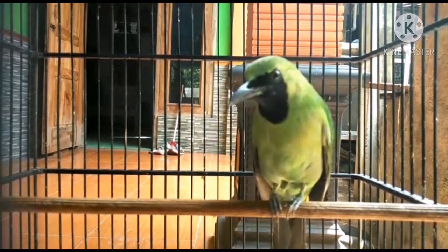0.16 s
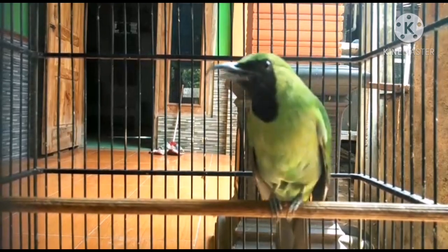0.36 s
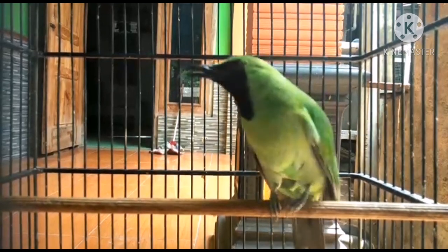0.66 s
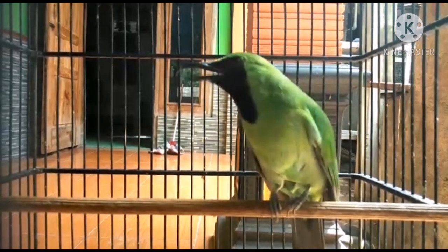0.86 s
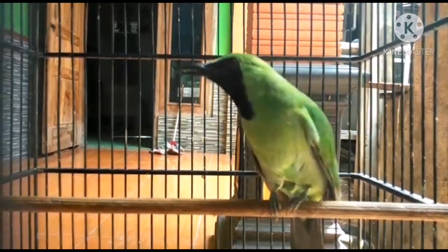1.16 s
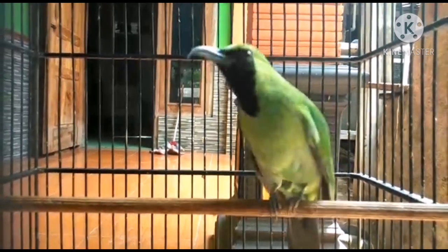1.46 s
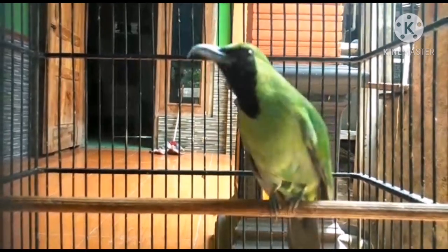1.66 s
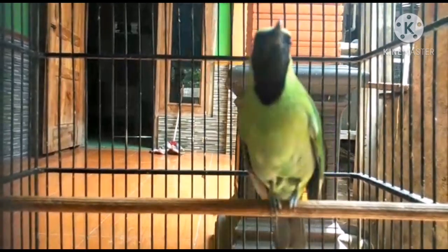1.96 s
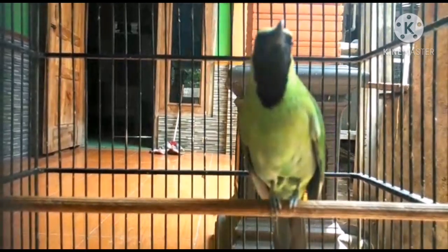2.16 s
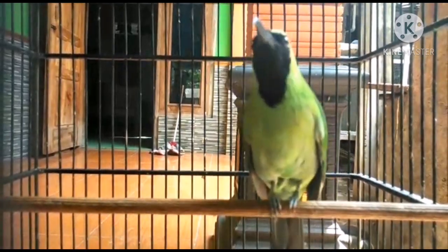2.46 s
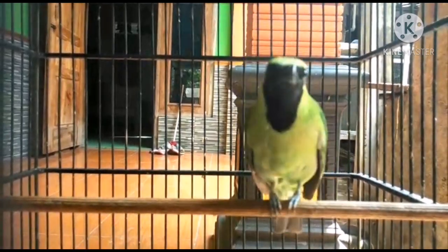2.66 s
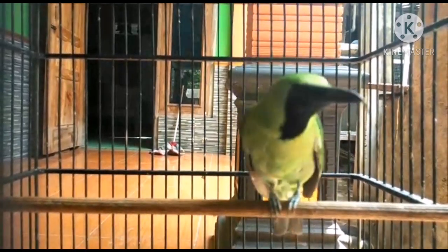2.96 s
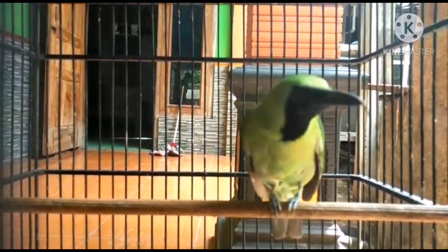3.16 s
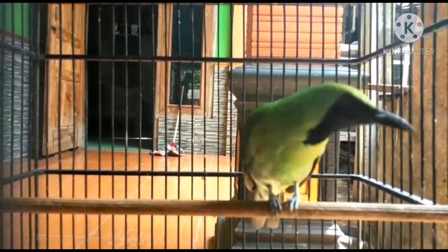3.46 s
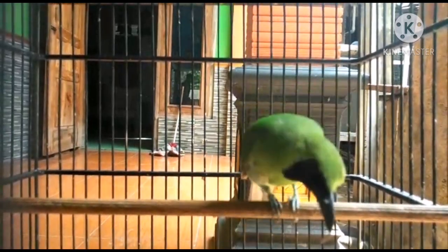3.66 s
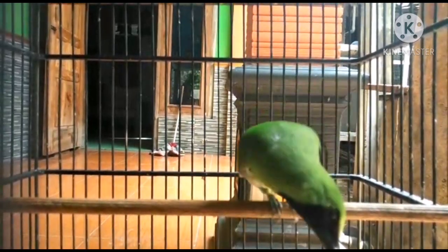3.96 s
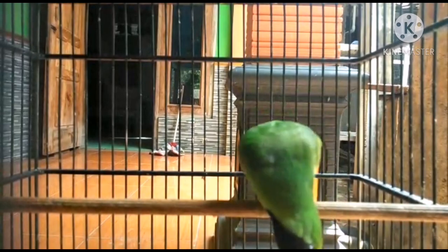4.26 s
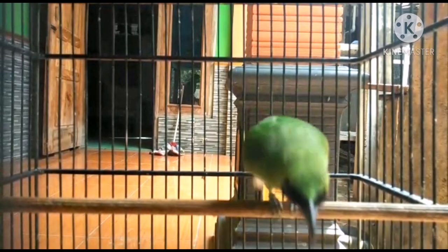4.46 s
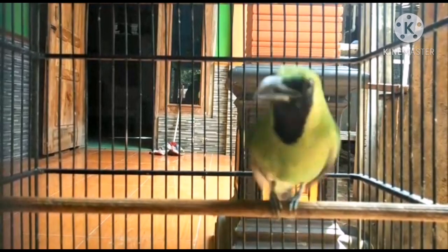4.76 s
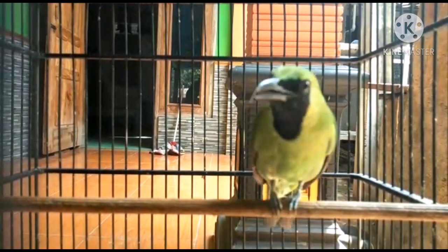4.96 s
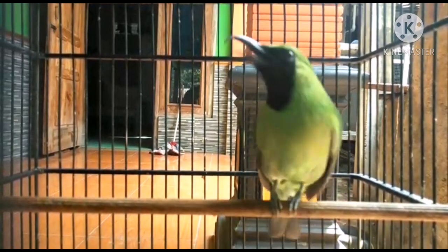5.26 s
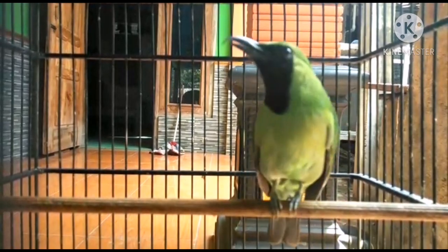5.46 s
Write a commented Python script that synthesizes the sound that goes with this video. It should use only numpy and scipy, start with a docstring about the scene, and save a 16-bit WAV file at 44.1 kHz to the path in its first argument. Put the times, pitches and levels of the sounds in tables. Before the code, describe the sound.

Loud, clear birdsong on a hard-walled terrace shifts from downward whistles to warbles, upward chirps and harsh buzzy notes, with a fainter bird beyond.

```python
"""A caged leafbird sings close by on a terrace: falling whistles, chatter, low warbles and hooks, rising
whistles, then rasping sweeps. Each note is a gliding tone with weak overtones plus turbulent hiss; the two
sides of the syrinx sometimes sound together. Enveloped noise makes clicks and the thud of a shuffle on the perch.
Floor and walls return the song as echoes and a decaying tail. A second bird sings thin tones farther off,
over a faint outdoor hush of shaped noise and steady hum."""
import sys
import numpy as np
from scipy import signal
from scipy.fft import rfft, irfft
from scipy.io import wavfile
from scipy.ndimage import uniform_filter1d, minimum_filter1d

SR = 44100
rng = np.random.default_rng(int(sys.argv[2]) if len(sys.argv) > 2 else 0)


def int16_out(signal):
    """Quantize to a 16-bit WAV file."""
    q = np.round(np.clip(np.atleast_2d(signal).T, -1, 1) * 32767)
    wavfile.write(sys.argv[1], SR, q.astype(np.int16))


N = 247401  # samples

OVERLAP_S = 0.004  # successive parts of a note overlap a little
STEADY = 0.003  # rms pitch tremble of a clear note, as a share of the pitch


def amp(db):
    """Level law: decibels to amplitude gain."""
    return 10 ** (np.asarray(db) / 20)


def unit(x):
    """Power normalisation: scales a signal to rms 1."""
    return x / np.sqrt(np.mean(x ** 2) + 1e-20)


def read(points, hz):
    """Interpolation on a logarithmic frequency axis."""
    f, value = np.transpose(points)
    return np.interp(np.log(hz + 1), np.log(f + 1), value)


def add(mix, s, sound):
    """Superposition: adds a sound into the mix at time s, in seconds."""
    part = mix[max(round(s * SR), 0):][:len(sound)]
    part += sound[:len(part)]


def noise(colour):
    """Spectral shaping: white noise weighted in frequency, then scaled to rms 1."""
    spectrum = rfft(rng.standard_normal(N))
    weight = amp(read(colour, np.fft.rfftfreq(N, 1 / SR)))
    return unit(irfft(spectrum * weight, N))


def waver(size, rate_hz):
    """Low-passed random modulation: a cycle of 8192 samples at rms 1, cut or repeated to size."""
    hz = np.fft.rfftfreq(8192, 1 / SR)
    spectrum = rfft(rng.standard_normal(8192))
    return np.resize(unit(irfft(spectrum / (1 + (hz / rate_hz) ** 4))), size)


def gesture(note, jitter, jitter_hz, fade=0.0036):
    """Frequency jitter and tapering: trembles the pitch and softens both ends over fade seconds."""
    s, pitch, level = note
    t = np.arange(len(pitch)) / SR
    ends = np.sin(np.pi / 2 * np.clip(np.minimum(t, t[-1] - t) / fade, 0, 1)) ** 2
    return s, pitch * np.exp(jitter * waver(len(t), jitter_hz)), level * ends


def swell(length, db, attack, release, curve):
    """Amplitude envelope: progress 0-1 and loudness; attack and release are shares of the length."""
    u = np.linspace(0, 1, round(length * SR))
    ramps = np.minimum(u / attack, 1) * np.minimum((1 - u) / release, 1)
    return u, amp(db) * ramps ** curve  # a higher curve is more pointed


def glide(s, length, pitches, db, attack, release, curve=1, ease=0):
    """Frequency glide: a polynomial through evenly spaced pitches; ease levels off its end."""
    u, level = swell(length, db, attack, release, curve)
    arc = np.polyfit(np.linspace(0, 1, len(pitches)), pitches, len(pitches) - 1)
    return s, np.polyval(arc, u - ease * u ** 10 / 10), level


def terrace(x, echo_db, tail_db, build=0.059):
    """Room response by convolution: direct sound, single echoes and a diffuse frequency-dependent decay."""
    # echoes from floor and walls: delay/s, level before echo_db/dB
    echoes = [(.0062, -29.5), (0.0097, -16.5), (0.016, -36), (0.0232, -20), (.031, -28.5), (0.041, -24.5)]
    # reverberation time: f/Hz, time to decay by 60 dB/s
    decay_times = [(500, 0.11), (2000, .52), (3000, 0.47), (5000, 0.64), (8000, 0.26), (15000, 0.55)]
    t = np.arange(SR) / SR
    hz, frame_s, z = signal.stft(rng.standard_normal(SR), SR, nperseg=256)
    decay = amp(-60 * frame_s / read(decay_times, hz)[:, None])
    tail = signal.istft(z * decay, SR, nperseg=256)[1][:SR]
    tail *= np.minimum(t / build, 1)  # the tail builds up first
    response = amp(tail_db) * tail / np.linalg.norm(tail)
    response[0] += 1
    for delay, db in echoes:
        response[round(delay * SR)] += amp(db + echo_db)
    return signal.fftconvolve(x, response)[:N]


def hush():
    """Stationary background: shaped noise of still outdoor air with the steady sines of a faint hum."""
    # spectrum of the air: f/Hz, relative level per Hz/dB
    air_colour = [(21, -39), (35, -6), (184, -6), (276, -19.5), (330, -6.5), (437, -12.5), (496, -6),
                  (938, -11), (1180, -13.5), (2020, -13.5), (2180, -22.5), (2350, -16.5), (3440, -23.5),
                  (15500, -33.5)]
    # faint steady tones of the neighbourhood: f/Hz, rms level/dB
    hum = [(774, -76), (921, -71.5)]
    t = np.arange(N) / SR
    sound = amp(-59) * noise(air_colour)
    for hz, db in hum:
        sound += amp(db) * np.sqrt(2) * np.sin(2 * np.pi * hz * t)
    return sound


def perch():
    """Impact excitation: decaying bursts of bright noise for clicks, slower low noise for the thud."""
    # claws on the perch and snaps of the beak: t/s, level/dB, decay to 1/e/s
    clicks = [(0.048, -51, 0.016), (0.307, -47, 0.0061), (.474, -44.5, 0.013), (.49, -37, 0.017),
              (.513, -40, 0.021), (0.864, -47.5, 0.0092), (1.36, -55, 0.0091), (2.23, -60.5, 0.0061),
              (2.589, -67.5, 0.0094), (5.465, -44, 0.042)]
    # click spectrum: f/Hz, relative level per Hz/dB
    click_colour = [(150, -14), (700, 5), (1800, 6), (4500, -4.5), (6800, 4.5), (9000, -9), (12000, -17),
                    (15000, 2)]
    # the perch takes the weight of the bird: t/s, level/dB
    thud = [(0.473, -71.5), (.5, -46), (0.517, -41.5), (.535, -53), (.57, -57.5), (0.679, -71)]
    # ring of the perch: f/Hz, relative level per Hz/dB
    thud_colour = [(40, -21.5), (85, -4.5), (125, -1), (250, -11), (450, -15.5), (720, -5), (1000, -14.5),
                   (2000, -34.5), (4000, -56.5)]
    t = np.arange(N) / SR
    strokes = np.zeros(N)
    for s, db, decay in clicks:
        add(strokes, s, amp(db) * np.exp(-t[:SR // 4] / decay))
    s, db = np.transpose(thud)
    weight = np.interp(t, s, amp(db), left=0, right=0)
    return strokes * noise(click_colour) + weight * noise(thud_colour)


def thin_tones(notes, jitter, jitter_hz):
    """Frequency modulation of bare sines: a fast, deep tremble turns a thin tone into a buzz."""
    song = np.zeros(N)
    for note in notes:
        start, hz, level = gesture(note, jitter, jitter_hz)
        add(song, start, level * np.sin(2 * np.pi * np.cumsum(hz) / SR))
    return song


def far_bird():
    """Light and deep frequency modulation: arched whistles and level buzzes of the second bird."""
    # whistles: t/s, length/s, first, middle and last f/Hz, level at the bird/dB
    whistle_rows = [ (.612, 0.03, 5600, 5900, 5700, -46), (.705, .075, 4000, 4380, 4100, -43),
                    (2.703, 0.079, 4830, 5120, 5060, -42.5), (2.823, 0.06, 5900, 5800, 5830, -43.5),
                    (2.823, .062, 5500, 5170, 5260, -45.5), (2.896, 0.067, 4490, 4770, 4640, -43.5),
                    (3.638, 0.054, 4650, 4790, 4730, -41), (3.835, 0.054, 4700, 5380, 5090, -36.5),
                    (4.108, 0.061, 4710, 5035, 5060, -39)]
    # buzzes: t/s, length/s, centre f/Hz, level at the bird/dB
    buzz_rows = [(0.599, .12, 6610, -39), (1.518, 0.061, 6900, -55), (1.6, 0.43, 6930, -66),
                 (2.636, 0.055, 6100, -40.5), (2.804, 0.074, 6600, -47.5), (3.1, .052, 6850, -60.5),
                 (3.547, 0.096, 6550, -43), (3.766, 0.071, 6450, -41), (4.037, 0.082, 6400, -40.5),
                 (5.349, 0.086, 6350, -44)]
    whistles = [glide(s, length, pitches, db, attack=0.13, release=0.59)
                for s, length, *pitches, db in whistle_rows]
    buzzes = [glide(s, length, [hz], db, attack=0.37, release=0.25)
              for s, length, hz, db in buzz_rows]
    return thin_tones(whistles, jitter=0.015, jitter_hz=350) + thin_tones(buzzes, jitter=0.092, jitter_hz=600)


def fading():
    """Free decay: a faint sine at one pitch, an earlier whistle dying away."""
    # t/s, length/s, f/Hz, level/dB
    s, length, hz, db = (0, 0.9, 2949.5, -49.5)
    note = glide(s, length, [hz], db, attack=0.05, release=0.7)
    return thin_tones([note], jitter=0.02, jitter_hz=200)


def leafbird(notes, overtone_db, slope_db, brighten, half_db, air_db, air_power, fuzz_db, fuzz_hz,
             jitter, jitter_hz, fade, linger, flicker_db=4):
    """Source and filter: a syrinx tone with weak overtones, half-pitch lines of uneven cycles, and turbulence."""
    # gain of throat and beak on the overtones: f/Hz, gain/dB
    beak = [(1000, -2.5), (1400, -4), (3000, 4.5), (4200, -16.5), (5200, -16.5), (5900, -8), (7300, 0.5),
            (8600, -14.5), (10500, -13.5), (12800, -10.5), (14700, 3), (16000, -1)]
    # air rushing with each note: f/Hz, relative level per Hz/dB
    air_colour = [(300, -10.5), (900, 0.5), (2500, -2), (4700, -3.5), (7000, 0.5), (9000, -9),
                  (11500, -17.5), (13500, -14.5), (15200, -5), (16000, -7)]
    song, flow = np.zeros(N), np.zeros(N)
    for note in notes:
        start, hz, level = gesture(note, jitter, jitter_hz, fade)
        phase = 2 * np.pi * np.cumsum(hz) / SR
        force_db = 20 * np.log10(level / amp(-16.5) + 1e-6)
        # pushing harder closes the syrinx more sharply, which lifts the high overtones
        octave_db = np.minimum(slope_db + brighten * force_db, 0)
        tone = np.sin(phase)
        for half in (1, *range(3, 17)):  # multiples of half the pitch, without the fundamental
            k = half / 2
            line_db = overtone_db + octave_db * max(np.log2(k / 2), 0)
            line_db += half_db * (half % 2) + read(beak, k * hz)
            line_db += flicker_db * waver(len(hz), 56)  # each overtone comes and goes by itself
            audible = k * hz < SR / 2
            tone += amp(line_db) * audible * np.sin(k * phase)
        # turbulence grows more slowly than the tone, so quiet starts and ends are the noisiest
        rush = amp(air_power * force_db)
        fuzz = waver(len(hz), fuzz_hz) * np.sin(phase) + waver(len(hz), fuzz_hz) * np.cos(phase)
        add(song, start, level * tone + amp(fuzz_db) * rush * fuzz)
        add(flow, start, rush)
    keep = np.exp(-1 / (linger * SR))  # the hiss swells and fades more slowly than the note
    hiss = signal.lfilter([1 - keep], [1, -keep], flow) * noise(air_colour)
    return song + amp(air_db) * hiss


def fall(s, length, first_hz, low_hz, turn_s, db, release):
    """Downward frequency sweep: the pitch swings to its lowest point and starts to come back."""
    u, level = swell(length, db, attack=0.33, release=release, curve=1.22)
    # a power under 1 brings the fall early
    swing = np.cos(np.pi / 2 * (u * length / turn_s) ** 0.88) ** 2
    return s, low_hz + (first_hz - low_hz) * swing, level


def chatters():
    """Beating of two voices: strokes overlap and a loud crest bursts out on top of the last."""
    # t/s, level of the strokes/dB, crest f/Hz, crest level/dB
    chatter_rows = [(.873, -19, 2767, -10.5), (1.115, -18, 2560, -16)]
    # strokes from alternate sides of the syrinx:
    # delay/s, length/s, first, middle and last f/Hz, level relative to the strokes/dB
    stroke_rows = [(.001, 0.027, 1940, 2400, 2790, -8), (.015, .048, 2310, 1884, 1600, -2.5),
                   (.037, .022, 2150, 2040, 1980, -3), (.058, .052, 1675, 2600, 1679, -1)]
    crest_delay_s, crest_s, crest_rise_hz = 0.073, 0.019, 129
    for s, db, crest_hz, crest_db in chatter_rows:
        for delay, length, *pitches, stroke_db in stroke_rows:
            yield glide(s + delay, length, pitches, db + stroke_db, attack=0.33, release=0.7, curve=0.63)
        crest = [crest_hz - crest_rise_hz, crest_hz]
        yield glide(s + crest_delay_s, crest_s, crest, crest_db, attack=0.36, release=0.45)


def warbles(gain_db=3):
    """Joint frequency and amplitude modulation: low notes sag, catch and drop away."""
    # one list for each warble: t/s, f/Hz, level before gain_db/dB
    warble_rows = [
        [(1.378, 2110, -34.5), (1.396, 2050, -20), (1.412, 1862, -19.5), (1.424, 1863, -20.5),
         (1.432, 2089, -22), (1.444, 1900, -17.5), (1.452, 2040, -30), (1.462, 1770, -20), (1.472, 1667, -26.5),
         (1.479, 1665, -35.5)],
        [(1.637, 2180, -43), (1.641, 2205, -33.5), (1.665, 2034, -21), (1.683, 1999, -16.5), (1.691, 1998, -23),
         (1.699, 2122, -23.5), (1.711, 2020, -18.5), (1.723, 2023, -24), (1.733, 1697, -24), (1.746, 1613, -37)],
    ]
    for rows in warble_rows:
        s, hz, db = np.transpose(rows)
        s = np.sort(s)
        t = np.arange(s[0], s[-1], 1 / SR)
        yield s[0], np.interp(t, s, hz), np.interp(t, s, amp(db + gain_db))


def hooks():
    """Register break: a wavy coo steps up steeply to an arch, whose end is roughened by the other side."""
    # t of the step/s, coo f/Hz, coo level/dB, step length/s, step level/dB,
    # arch length/s, its first, middle and last f/Hz, arch level/dB
    hook_rows = [(1.965, 1938, -20, 0.016, -12, .037, 2916, 2762, 2386, -11.5),
                 (2.296, 2011, -19, .021, -10, 0.035, 2700, 2958, 2684, -14),
                 (2.654, 2006, -20, .019, -11.5, .038, 2680, 2990, 2770, -11)]
    coo_s, coo_wave_hz = 0.052, (-170, 3.5, -69, 0)  # the coo waves about its pitch
    step_hz = (2174, 2810)
    join_share, join_hz, join_db = 0.4, (3173, 3200, 2930), -24.5  # the other side joins part-way
    for s, coo_hz, coo_db, step_s, step_db, arch_s, *pitches, db in hook_rows:
        top = s + step_s - OVERLAP_S
        coo = np.add(coo_hz, coo_wave_hz)
        yield glide(s - coo_s, coo_s + OVERLAP_S, coo, coo_db, attack=0.48, release=0.45, curve=1.3)
        yield glide(s, step_s, step_hz, step_db, attack=0.58, release=0.3)
        yield glide(top, arch_s, pitches, db, attack=0.077, release=0.76)
        yield glide(top + join_share * arch_s, (1 - join_share) * arch_s, join_hz, join_db,
                    attack=0.37, release=0.24)


def chirps():
    """Short frequency sweeps with an abrupt release."""
    # t/s, length/s, first, middle and last f/Hz, level/dB
    chirp_rows = [(5.481, .015, 2400, 2700, 3050, -17), (5.493, .03, 2600, 2697, 2374, -12),
                  (5.598, .03, 1756, 2540, 2700, -28)]
    return [glide(s, length, pitches, db, attack=0.4, release=0.11)
            for s, length, *pitches, db in chirp_rows]


def rises():
    """Upward frequency sweep: a soft scoop, then a climb that swells, levels off and fades."""
    # t/s, length/s, first, middle and last f of the climb before it levels off/Hz, level/dB,
    # lead-in length/s, its first f/Hz, its level/dB
    rise_rows = [ (3.503, 0.08, 2826, 3880, 3664, -17, 0.015, 2190, -44.5),
                 (3.672, 0.064, 3035, 3587, 4014, -19.5, 0.029, 2955, -29),
                 (3.838, 0.064, 3094, 3660, 4110, -19.5, 0.04, 2940, -31.5),
                 (3.997, 0.08, 3247, 3532, 4260, -19.5, 0.013, 2790, -32.5),
                 (4.209, 0.052, 3090, 3650, 4050, -19, 0.029, 2810, -37),
                 (4.406, 0.072, 3035, 3525, 4010, -22, .016, 2930, -34.5),
                 (4.622, 0.058, 3080, 3700, 4310, -22, 0.033, 2770, -38.5),
                 (4.834, 0.079, 3080, 3660, 3890, -25, 0.027, 2870, -34.5)]
    lead_step_hz, lead_sag_hz = 50, 79  # the lead-in sags in the middle and ends just under the climb
    for s, length, *pitches, db, lead_s, lead_hz, lead_db in rise_rows:
        end_hz = pitches[0] - lead_step_hz
        scoop = [lead_hz, (lead_hz + end_hz) / 2 - lead_sag_hz, end_hz]
        yield glide(s - lead_s, lead_s + OVERLAP_S, scoop, lead_db, attack=0.49, release=0.3, curve=0.72)
        yield glide(s, length, pitches, db, attack=0.52, release=0.38, curve=0.84, ease=1.0)


def shrill():
    """Loud frequency sweep: one bright glide that climbs steeply, rich in overtones."""
    # t/s, length/s, (first, middle and last f/Hz), level/dB
    sweep = (4.854, 0.089, (2150, 3510, 4030), -13)
    return [glide(*sweep, attack=0.29, release=0.71, curve=1.19)]


def rasps():
    """Two-source roughness: a growl opens into a steep sweep; the second side bursts in late, ending lower."""
    # t/s, length/s, level/dB, lag of the second side/s, its level/dB
    rasp_rows = [(5.071, .067, -19.5, .016, -15), (5.286, .066, -20, .011, -18.5)]
    # evenly spaced pitches in Hz
    rasp_hz, trail_hz, growl_hz = (2330, 3190, 4150, 4320), (2416, 3296, 3440), (1480, 1770, 2210)
    growl_s, growl_db = 0.026, -35
    for s, length, db, lag, trail_db in rasp_rows:
        yield glide(s - growl_s + OVERLAP_S, growl_s, growl_hz, growl_db, attack=0.84, release=0.069)
        yield glide(s, length, rasp_hz, db, attack=0.059, release=0.2)
        yield glide(s + lag, length - lag, trail_hz, trail_db, attack=0.045, release=0.98, curve=1.37)


def near_song():
    """Spectral purity by note type: each has its own overtones, hiss and tremble."""
    # falling whistles: t/s, length/s, first f/Hz, lowest f/Hz, time to the lowest/s, level/dB,
    # release as a share of the length, overtone level/dB
    fall_rows = [ (0.07, .112, 3610, 2909, 0.081, -14.5, 0.15, -17.5),
                 (0.324, 0.12, 3528, 2842, 0.087, -12, 0.25, -21.5),
                 (0.602, 0.13, 3390, 2896, .098, -11, 0.63, -26)]
    song = np.zeros(N)
    for *row, overtone_db in fall_rows:
        song += leafbird([fall(*row)], overtone_db=overtone_db, slope_db=-22.5, brighten=0.2, half_db=-44.5,
                         air_db=-73.5, air_power=0.51, fuzz_db=-56.5, fuzz_hz=350,
                         jitter=0.0024, jitter_hz=250, fade=0.0031, linger=0.005)
    song += leafbird(chatters(), overtone_db=-27.5, slope_db=-8, brighten=0.1, half_db=-9.5,
                     air_db=-57, air_power=0.68, fuzz_db=-36, fuzz_hz=373,
                     jitter=0.013, jitter_hz=300, fade=0.0017, linger=0.004)
    song += leafbird([*hooks(), *chirps()], overtone_db=-28, slope_db=-8.5, brighten=0.15, half_db=-9,
                     air_db=-65.5, air_power=0.5, fuzz_db=-42, fuzz_hz=320,
                     jitter=0.0053, jitter_hz=250, fade=0.0038, linger=0.004)
    song += leafbird(warbles(), overtone_db=-30.5, slope_db=-6.5, brighten=0.083, half_db=-5.5,
                     air_db=-61, air_power=0.23, fuzz_db=-47, fuzz_hz=318,
                     jitter=STEADY, jitter_hz=253.4, fade=0.003, linger=0.004)
    song += leafbird(rises(), overtone_db=-25.5, slope_db=-26, brighten=0.5, half_db=-16,
                     air_db=-47.5, air_power=0.27, fuzz_db=-47.5, fuzz_hz=460,
                     jitter=STEADY, jitter_hz=400, fade=0.0025, linger=0.029)
    song += leafbird(shrill(), overtone_db=-22, slope_db=-8.5, brighten=0.11, half_db=-17,
                     air_db=-65, air_power=0.27, fuzz_db=-39.5, fuzz_hz=500,
                     jitter=0.0087, jitter_hz=500, fade=0.0028, linger=0.008)
    song += leafbird(rasps(), overtone_db=-11.5, slope_db=-13, brighten=0.57, half_db=-18.5,
                     air_db=-50.5, air_power=0.5, fuzz_db=-31, fuzz_hz=650,
                     jitter=0.028, jitter_hz=523, fade=0.002, linger=0.0025)
    return song + fading()


def scene():
    """Direct-to-reflected ratio as distance: weak reflections for the near bird, strong for the far one."""
    near = terrace(near_song() + perch(), echo_db=2.0, tail_db=-19)
    far = amp(-4.5) * terrace(far_bird(), echo_db=13, tail_db=-5.5)
    return (near + far + hush())[None]


def record(dry, ceiling_db=-9):
    """Dynamic range and band limiting: a quick limiter holds the loudest notes, then a low-pass filter."""
    gain = np.minimum(1, amp(ceiling_db) / (abs(dry) + 1e-9))
    gain = uniform_filter1d(minimum_filter1d(gain, size=180), size=180)  # window in samples
    low_pass = signal.firwin(511, 15900, window=("kaiser", 9), fs=SR)  # cutoff in Hz
    return signal.oaconvolve(dry * gain, low_pass[None], "same")


dry = scene()
out = record(dry)
int16_out(out)
```